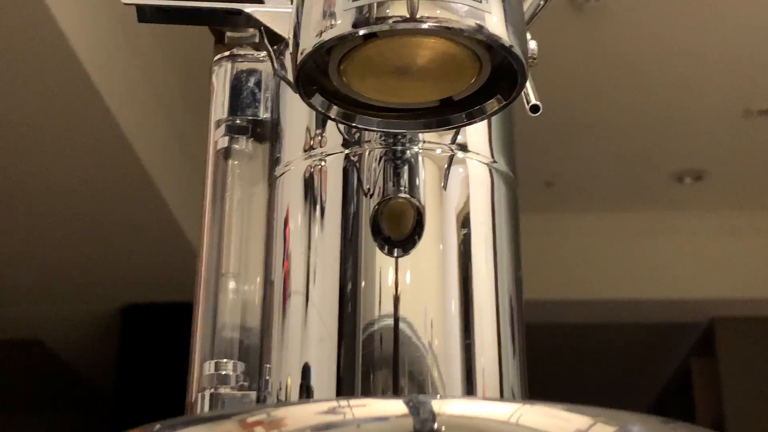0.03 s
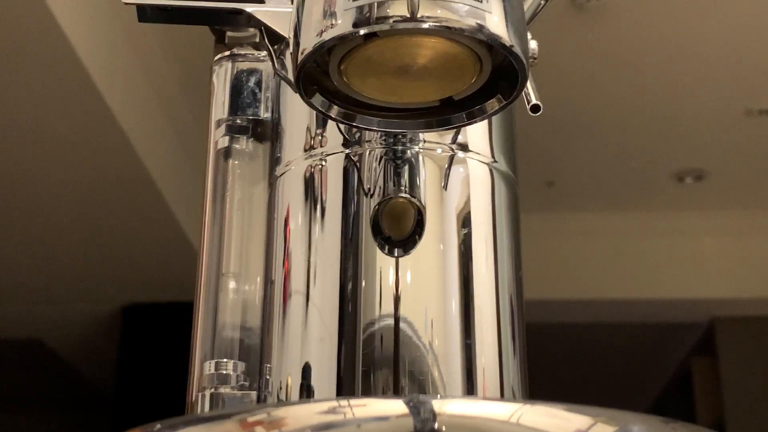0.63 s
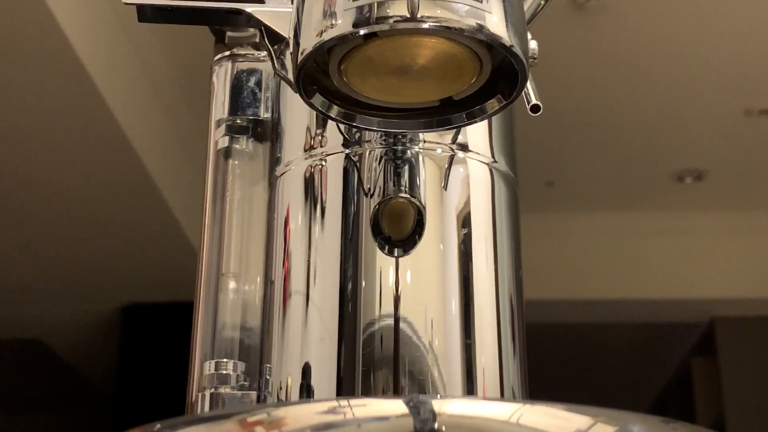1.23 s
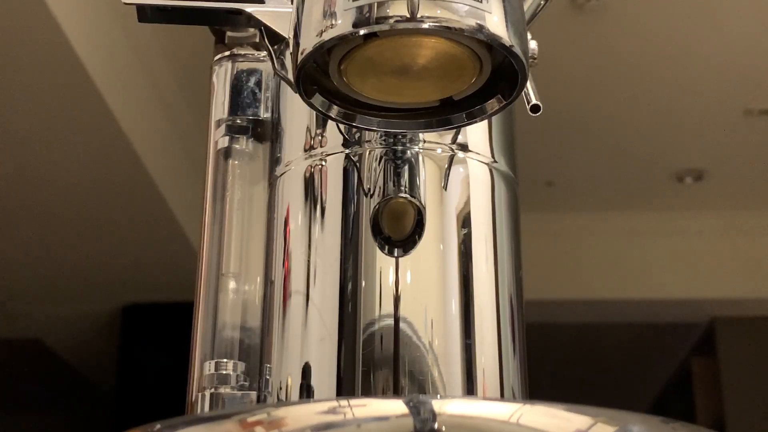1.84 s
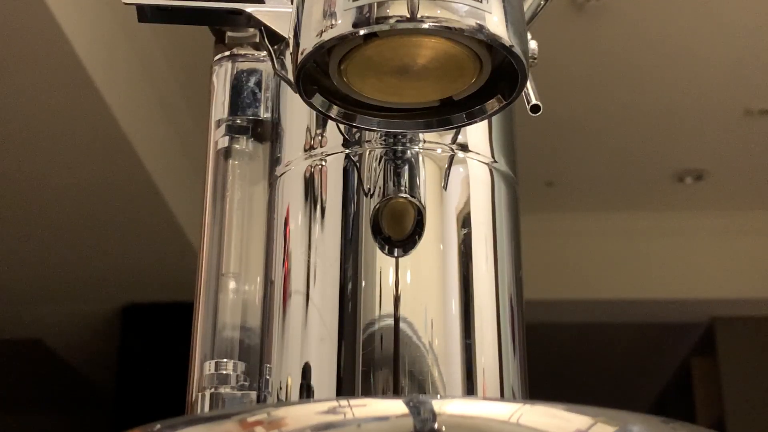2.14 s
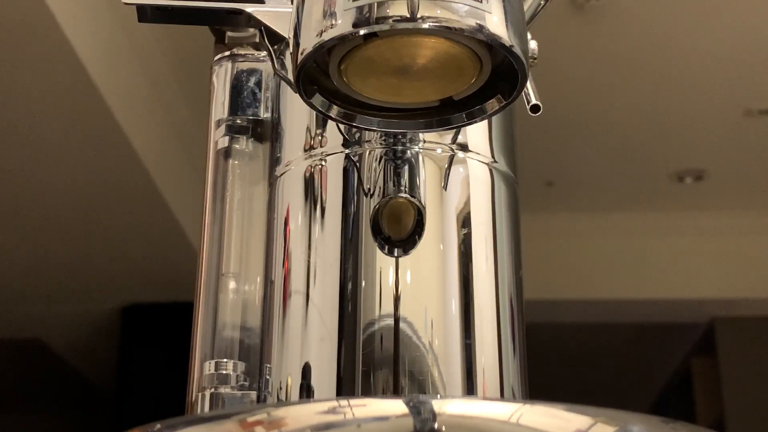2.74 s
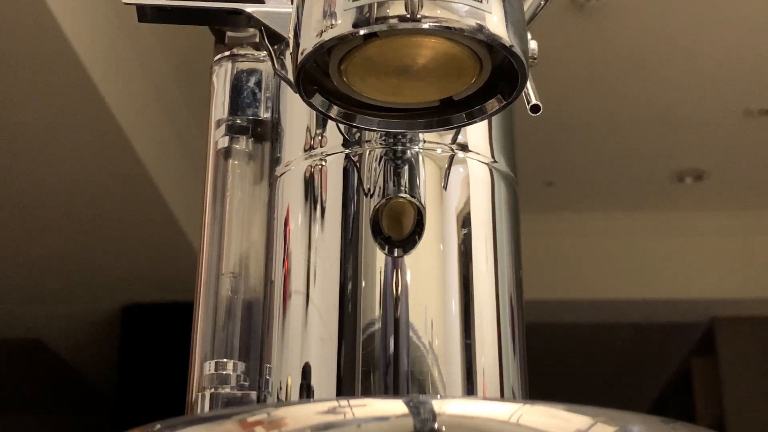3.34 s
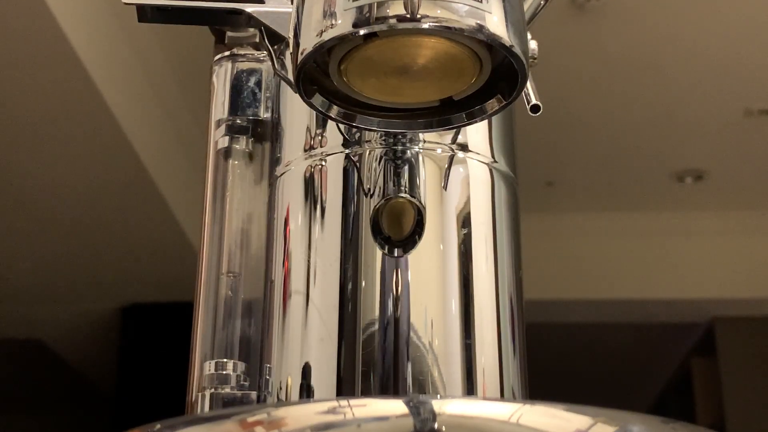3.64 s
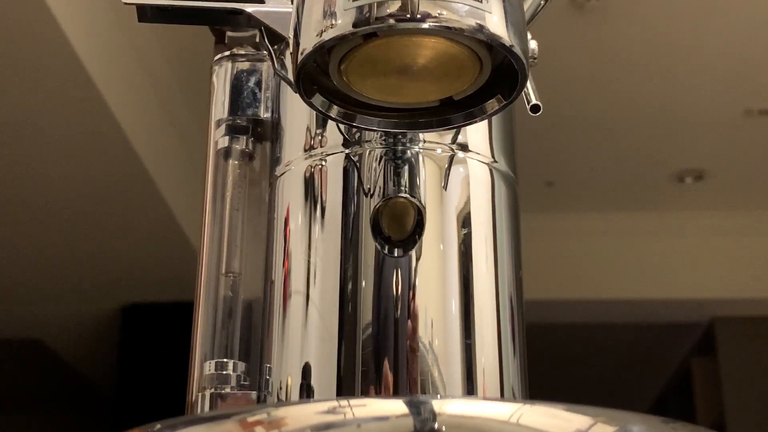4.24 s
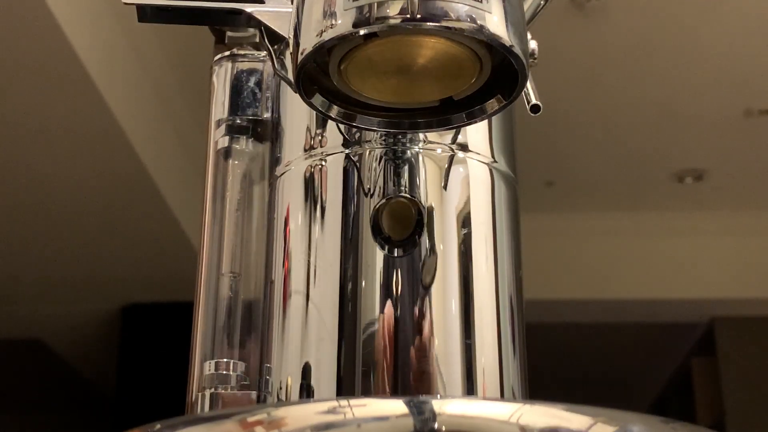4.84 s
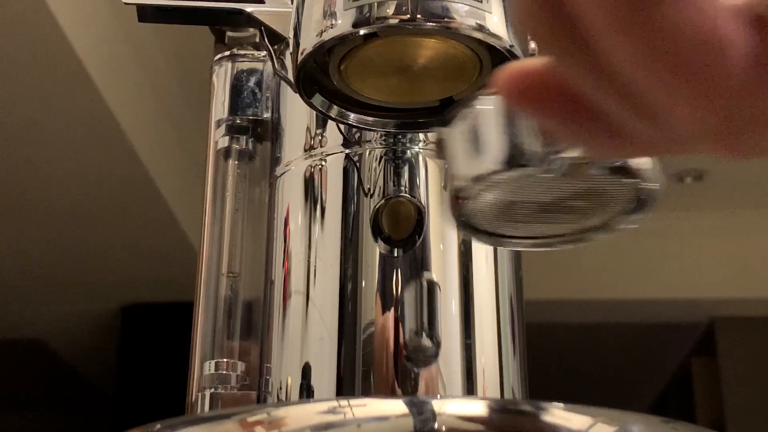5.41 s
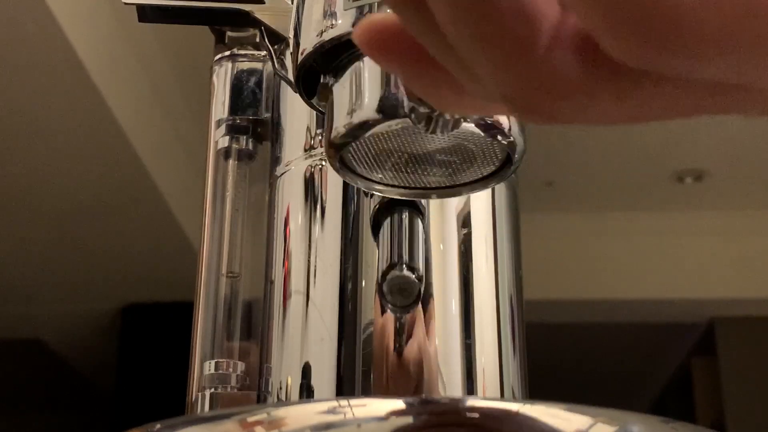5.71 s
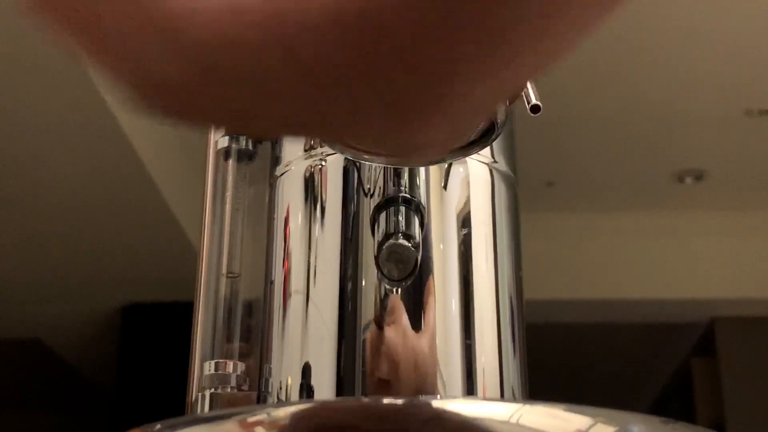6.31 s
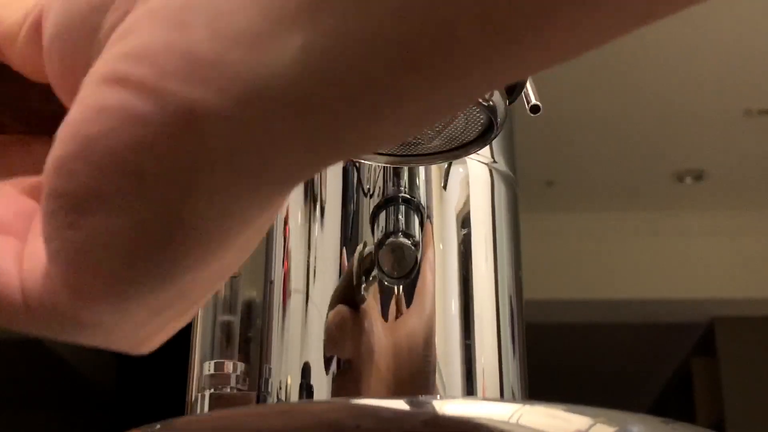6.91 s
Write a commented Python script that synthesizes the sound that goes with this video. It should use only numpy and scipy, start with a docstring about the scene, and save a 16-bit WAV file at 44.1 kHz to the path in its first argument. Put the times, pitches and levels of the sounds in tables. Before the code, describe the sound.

Close up in stereo, a metal portafilter is locked into an espresso machine in a quiet kitchen. At first there is only low room hum, a passing drone, faint rubbing and a far-off knock. Near the end comes one sharp steel clack, then a quick ringing rattle with low thumps as the machine rocks. A fine hiss of metal on rubber and small ticks follow as it tightens.

```python
"""A quiet kitchen hums; a low drone passes, then comes soft rubbing with faint squeaks and far-off knocks.
Close to the stereo microphones a steel portafilter clacks against the group head of a lever espresso
machine. Its lugs rattle into their slots, each contact ringing the steel, and the machine rocks and
shudders on the counter. It is turned tight with a fine hiss of rim on rubber and a few last ticks."""
import sys
import numpy as np
from scipy import signal
from scipy.fft import rfft, irfft, next_fast_len
from scipy.io import wavfile

SR = 44100
rng = np.random.default_rng(int(sys.argv[2]) if len(sys.argv) > 2 else 0)


def transcribe(u):
    """Save the signal u as a 16-bit wav file named by the first command-line argument.

    u: samples, shape (n,) or (channels, n), limited to [-1, 1]; the rate is SR.
    q: integer samples, one column per channel.
    """
    v = np.clip(np.atleast_2d(u).T, -1, 1)
    q = np.round(v * 32767).astype(np.int16)
    wavfile.write(sys.argv[1], SR, q)


N = 311346
TIME = np.arange(N) / SR
SEATED_DETUNE = .025  # the lugs' changing grip shifts each upper steel mode by up to this share

# dull bumps of the machine and counter: t/s, level/dB, f/Hz
MACHINE_BUMPS = [(0.108, -41.5, 278), (5.642, -35, 228), (5.644, -32.5, 107), (5.662, -38, 240),
                 (5.668, -32.5, 90), (5.727, -40, 72), (5.813, -32, 243), (5.815, -38, 100),
                 (5.848, -35.5, 220), (5.8831, -26, 101.5), (5.887, -34.5, 164), (5.913, -35, 242),
                 (5.937, -23, 87), (5.938, -37, 239), (5.969, -32, 65.5), (6.113, -40, 155),
                 (6.219, -36, 85.6)]
# how alike the two microphones hear the room and the frame: f/Hz, likeness
ROOM_LIKENESS = [(60, 0.95), (130, 0.94), (290, 0.8), (640, 0.089), (1410, 0.19), (3100, -0.1),
                 (6820, 0.13), (15000, -0.7)]


def portafilter(crack_db, level_db):
    """Steel on steel, close up: the free clack, the rattle of the lugs and the last ticks."""
    # One contact a row; the harder the gasket is pressed, the shorter the ring:
    # t/s, clack/dB, hollow/dB, bowl ring/dB, sparkle/dB (these three relative to the clack),
    # knock/Hz, bowl/Hz, ping/Hz, ping/dB, share of the free ring time
    contacts = [(1.407, -68.5, -8, 1, -10, 900, 1310, 3980, 11, 0.63),
                (5.6298, -28, -14.5, -6.5, 1.5, 624, 1377, 3070, -14, 0.75),
                (5.6398, -47, -4, -14, 4, 650, 1360, 2080, -2, 0.51),
                (5.6553, -47.5, -0.5, -14, -7, 660, 1368, 2080, -4, .45),
                (5.803, -58, 6, -8, -8, 710, 1430, 2700, -2, 0.45),
                (5.8084, -49, -3.5, -9, -2.5, 1050, 1460, 3180, -2, 0.48),
                (5.8156, -56, -5, 4, -13, 845, 1390, 2690, 2, 0.9),
                (5.8209, -51.5, -12, -9, -9, 960, 1290, 4050, 7, 0.49),
                (5.830, -52, 5, 10, -19, 1020, 1310, 2640, -1, 1),
                (5.841, -41, -5, -2, -6.5, 856, 1140, 3120, -10, 0.26),
                (5.8485, -56.5, 8.5, -3, -16, 700, 1190, 2900, 0, 0.57),
                (5.875, -50.5, 3, 6, -8, 1190, 1380, 2680, 8, 0.89),
                (5.8798, -54, -12, -8, 5, 900, 1370, 4100, -2, 0.39),
                (5.911, -47, -4, -5, -8.5, 700, 1410, 2745, 7, 0.23),
                (5.930, -54.5, 10, 3, -13, 797, 1400, 1880, 1, 0.91),
                (5.9519, -50, 1, -17, -8.5, 1050, 1410, 4130, 3, .6),
                (6.115, -51.5, 0, -.5, -7, 1100, 1320, 2690, 6, 0.92),
                (6.1367, -56.5, -2, 2.5, -19, 850, 1130, 2420, 4, 0.5),
                (6.17, -49, 1, -2, -19, 1000, 1180, 3590, 4.5, 0.59),
                (6.2063, -64, 1, 0, -18, 900, 1200, 3650, 6, .4),
                (6.255, -67, 4, -5, -17, 900, 1200, 2700, 11, .4),
                (6.285, -65.5, 6.5, 4, -9, 968, 1155, 2480, 6, .97),
                (6.6975, -57.5, -4.5, -8, -22, 850, 1280, 2770, 8, 0.69),
                (6.862, -52, -16, -5, -14, 950, 1237, 3540, 17, 0.52)]
    seated_s = 5.75
    out = np.zeros((2, N))
    for s, clack_db, hollow_db, ring_db, sparkle_db, *tuning in contacts:
        register_db = level_db + clack_db + np.array([hollow_db, ring_db, 0, sparkle_db])
        detune = SEATED_DETUNE * (s > seated_s)
        add(out, s, strike(register_db, *tuning, crack_db, detune))
    return out


def strike(register_db, knock_hz, bowl_hz, ping_hz, ping_db, ring_share, crack_db, detune):
    """One contact: steel modes over a short crack; where it lands tunes the knock, bowl and ping."""
    # modes of portafilter and group head: f/Hz, level/dB, t60/s, lead at the left microphone/rad
    steel_modes = [(640, -15.5, .05, 3.3), (850, -16.5, .04, 2.5), (975, -13, .05, 1.5),
                   (1080, -11, 0.044, 2), (2030, 5, .015, 2.5), (2680, -15.5, .07, 5),
                   (2874, -1, 0.023, 3.9), (3110, -1, .023, 1.5), (3340, -12.5, 0.061, 2.5),
                   (3860, 8, .011, 3.8), (4430, 4.5, 0.01, 3.5), (4430, -19, .21, -2),
                   (4580, -16, .018, -1.5), (5092, -4, .014, 3.5), (5240, -30, .15, 3),
                   (5600, -12.5, 0.01, -2.3), (5970, 3, .013, 4.5), (6000, -22.5, 0.19, -1),
                   (6840, 0.5, 0.0133, 4.2), (7900, 5.5, 0.007, -1), (8250, -4, 0.012, 5),
                   (8600, -7, .016, -0.5), (8990, -1.5, .015, 4.5), (9743, -1.5, 0.012, -0.1),
                   (10370, 1.5, .014, 0.5), (10520, -2.5, 0.014, 1), (12661, -4.5, .016, 4.5),
                   (12960, -8, .016, 1.1), (13800, -8, .012, 2), (14104, -7, .015, 0)]
    # steel crack, with a notch filtered out near 12 kHz: f/Hz, density/dB
    crack_spectrum = [(300, 5.5), (650, -3.5), (1000, 0), (1600, 1.5), (2000, 7), (2500, 4), (3000, 7.5),
                      (3700, 4), (4400, 5), (5400, 0.5), (6500, 5), (8100, 4.5), (10300, 0), (11800, -13.5),
                      (13500, -3.5), (15000, -24), (16500, -34.5)]
    # how alike the two microphones hear the metal: f/Hz, likeness
    steel_likeness = [(400, 0.74), (1400, 1), (2400, -0.58), (4500, -0.24), (8000, -0.69), (14000, 0.64)]
    # edges of the low, clack and sparkle registers: f/Hz
    register_hz = [420, 1650, 5500, 17000]
    crack_t60, rise_s = .018, .00046
    t = np.arange(8192) / SR
    ping = [(ping_hz * ratio, ping_db - 4, .03, 1.8) for ratio in (.98, 1.03)]  # columns as steel_modes
    body = [(knock_hz, -8, .04, .4), (bowl_hz, -1, .052, .4)]
    hz, db, t60, lead = np.transpose(steel_modes + ping + body)[:, :, None]
    shift = detune * rng.uniform(-.89, 1, hz.shape) * (hz > register_hz[1])
    shift[len(steel_modes):] = 0  # ping and body keep their pitch
    angle = 2 * np.pi * hz * (1 + shift) * t  # one blow starts all modes together
    decay = amp(db - 60 * t / (t60 * ring_share))
    ring = np.array([(decay * np.sin(angle + side * lead)).sum(0) for side in (.5, -.5)])
    crack = amp(crack_db - 60 * t / crack_t60) * noise(crack_spectrum, len(t), steel_likeness)
    blow = (ring + crack) * (1 - np.exp(-(t / rise_s) ** 2))
    edges = sorted(register_hz + [.88 * bowl_hz])  # splits the low register into hollow and bowl ring
    out = np.zeros_like(blow)
    for lo, hi, level_db in zip(edges, edges[1:], register_db):
        bandpass = signal.butter(3, [lo, hi], "band", fs=SR, output="sos")
        band = signal.sosfiltfilt(bandpass, blow, padtype=None)
        attack_rms = np.sqrt(np.mean(band[:, :SR // 50] ** 2))
        out += amp(level_db) * band / attack_rms
    return out


def lugs(level_db=-76, start_s=5.803, end_s=5.94):
    """The lugs scrape in their slots: tiny slips that ring the same steel."""
    train = slips(N, per_s=110, spread_db=3) * (TIME > start_s) * (TIME < end_s)
    ring = strike(level_db + np.array([9, -3, 15, -5]), knock_hz=840, bowl_hz=1350, ping_hz=2700,
                  ping_db=29.5, ring_share=.29, crack_db=5, detune=SEATED_DETUNE)
    return signal.oaconvolve(train[None], ring, axes=1)[:, :N]


def bumps(level_db=-2):
    """The heavy machine rocks on the counter: low swings that build and die."""
    out, t = np.zeros((2, N)), np.arange(SR // 2) / SR
    for s, db, hz in MACHINE_BUMPS:
        swell_s = .0084 * (100 / hz) ** .4  # lower bumps swell more slowly
        envelope = t / swell_s * np.exp(1 - t / swell_s)
        add(out, s, amp(db + level_db) * envelope * np.sin(2 * np.pi * hz * t))
    return out


def shudder(touch_s=5.6, rise_s=.017, decay_s=.047):
    """Once steel touches the head, the frame shudders after each bump and while the hand leans on it."""
    # the hand's pushes as it tightens: t/s, level/dB, swell/s, ease/s
    pushes = [(6.27, -50.5, 0.14, 0.69), (6.83, -47.5, 0.081, 0.12)]
    # rumble of the frame: f/Hz, density/dB
    frame_spectrum = [(20, -16.5), (40, -1), (75, 6.5), (140, -4), (200, -3), (270, -13.5), (340, -2.5),
                      (450, -32.5), (650, -29), (1200, -37.5), (3000, -72)]
    power = strokes(pushes) ** 2
    for s, db, _ in MACHINE_BUMPS:
        if s > touch_s:
            t = np.maximum(TIME - s, 0)
            envelope = (1 - np.exp(-t / rise_s)) * np.exp(-t / decay_s)
            power += (amp(-25 + .47 * db) * envelope) ** 2  # harder bumps shake it more
    return np.sqrt(power) * noise(frame_spectrum, next_fast_len(N), ROOM_LIKENESS)[:, :N]


def rim_slide(level_db=-1):
    """A grainy hiss as the rim slides into the slots and round under the gasket."""
    # turns of the handle: t/s, level/dB, swell/s, ease/s
    turns = [(5.8, -58.5, 0.047, 0.069), (6.21, -66, 0.016, .1), (6.33, -64, 0.04, 0.18),
             (6.47, -66.5, 0.24, 0.19), (6.82, -75, 0.045, 0.26)]
    # rim hiss, with a notch filtered out near 12 kHz: f/Hz, density/dB
    slide_spectrum = [(600, -3), (1300, 2), (2000, -2), (2800, 8.5), (3700, 3), (4700, 7), (5600, 0.5),
                      (7600, 7.5), (8600, 0), (10300, 4), (12000, -14.5), (13700, -9), (15000, -31)]
    # steel resonances it excites: f/Hz, width/Hz, lift/dB
    resonances = [(2680, 200, 7), (3700, 200, 5), (4650, 220, 6)]
    hiss = scrape(slide_spectrum, slips_per_s=2500, spread_db=3, peaks=resonances)
    return amp(level_db) * strokes(turns) * hiss * flutter(depth_db=1.3, grain_s=.008)


def gasket(level_db=-1):
    """Rubber sizzles under the rim as the handle is turned tight."""
    # how hard the gasket drags, in three surges: t/s, level/dB
    effort = [(6.25, -88), (6.275, -72), (6.315, -67), (6.345, -70), (6.39, -72), (6.45, -65), (6.5, -64),
              (6.56, -70), (6.61, -62), (6.66, -72.5), (6.72, -91)]
    # gasket sizzle, with a notch filtered out near 12 kHz: f/Hz, density/dB
    drag_spectrum = [(7000, -24), (8800, -8), (9800, -2), (10800, -1), (11500, -2), (12100, -7),
                     (12800, -2.5), (14200, -2.5), (14800, -28)]
    # steel resonances it excites: f/Hz, width/Hz, lift/dB
    resonances = [(9900, 290, 4.6), (10560, 110, 7)]
    sizzle = scrape(drag_spectrum, slips_per_s=5000, spread_db=2.7, peaks=resonances)
    return amp(level_db) * swell(effort) * sizzle * flutter(depth_db=.8, grain_s=.014)


def rubbing(level_db=2):
    """Soft strokes of friction as the portafilter is readied."""
    # strokes of the hand: t/s, level/dB, swell/s, ease/s
    rubs = [(1.58, -67, .02, 0.075), (1.67, -69.5, 0.059, .07), (2.055, -65.5, 0.1, 0.071),
            (2.51, -69, 0.17, 0.17), (2.6, -65.5, 0.12, 0.15), (2.745, -69.5, 0.031, 0.036),
            (2.95, -72.5, 0.43, 0.27), (3.26, -65, 0.21, 0.056), (3.42, -73, 0.29, 0.52),
            (3.88, -77, 0.27, 0.094), (4.08, -77, 0.048, 0.18), (4.38, -78.5, 0.19, 0.16),
            (4.695, -71.5, 0.072, 0.028), (4.965, -76.5, 0.074, 0.056)]
    # rubbing noise, with a notch filtered out near 12 kHz: f/Hz, density/dB
    rub_spectrum = [(500, -3), (1400, 3.5), (2600, -0.5), (4000, -1), (6500, -3.5), (10000, -5.5),
                    (12000, -23), (13500, -10), (15000, -58)]
    rub = scrape(rub_spectrum, slips_per_s=5000, spread_db=2.5)
    return amp(level_db) * strokes(rubs) * rub * flutter(depth_db=1.3, grain_s=.011)


def friction_bands():
    """Brief bands of friction noise: faint squeaks, a rasp and a high hiss."""
    # one band a row: t/s, level/dB, f/Hz, width/Hz, half length/s
    bands = [(1.888, -71.5, 2370, 700, 0.08), (2.55, -64.5, 3640, 1900, 0.073),
             (4.1, -73, 12500, 2400, 0.053), (5.38, -80, 4830, 500, 0.044), (6.288, -59, 10300, 900, 0.021)]
    out, size = np.zeros((2, N)), next_fast_len(N)
    hz = np.fft.rfftfreq(size, 1 / SR)
    for s, db, centre_hz, width_hz, half_s in bands:
        white = rfft(rng.standard_normal((2, size)))
        band = irfft(white * resonance(hz, centre_hz, width_hz), size)[:, :N]
        out += amp(db) * unit(band) * np.exp(-((TIME - s) / half_s) ** 2)
    return out * flutter(depth_db=-1, grain_s=.0054)


def distant_knocks(tick_db=3, tick_t60=.014, reverb_db=-2, rise_s=.0025, ring_s=.034, tail_s=.06):
    """Knocks further off in the room: each a short sharp tick, then its own reverberation."""
    # faint knocks: t/s, level/dB
    knocks = [(3.4537, -51.5), (4.596, -70.5)]
    # colours of the tick and of its reverberation: f/Hz, density/dB
    tick_spectrum = [(500, -9), (1800, -10), (3300, 13), (5200, -5), (6300, -2), (7500, -24), (15000, -40)]
    reverb_spectrum = [(300, 15), (900, 11), (1700, 10), (2600, 5), (3700, 3), (5000, -3), (7000, -7),
                       (10000, -39), (15000, -42)]
    resonances = [(2320, 250, 7.1), (3730, 230, 4.6), (4340, 160, 1.8)]  # f/Hz, width/Hz, lift/dB
    out, t = np.zeros((2, N)), np.arange(16384) / SR
    bloom = (np.exp(-t / ring_s) + amp(-6) * np.exp(-t / tail_s)) * (1 - np.exp(-t / rise_s))
    for s, db in knocks:
        tick = amp(-60 * t / tick_t60) * noise(tick_spectrum, len(t), likeness=[(1000, .6), (8000, .6)])
        reverb = bloom * noise(reverb_spectrum, len(t), peaks=resonances)
        add(out, s, amp(db + tick_db) * tick + amp(db + reverb_db) * reverb)
    return out


def kitchen(sound, near_db=-9, near_t60=.11, far_db=-14, build_s=.008):
    """Back at the microphones: single echoes, quick scatter off machine and counter, the room's tail."""
    # reflections from counter and walls: delay/s, level/dB
    echoes = [(.0094, -25), (0.0055, -15), (0.017, -24), (0.033, -51)]
    # decay of the kitchen: f/Hz, t60/s
    decay_times = [(200, 0.43), (1000, 0.59), (3000, 0.43), (4500, 0.42), (7000, 0.34), (14000, 0.29)]
    size = SR // 2
    t = np.arange(size) / SR
    hz, frame_s, white = signal.stft(rng.standard_normal((2, size)), SR, nperseg=256)
    decay = amp(-60 * frame_s / read(decay_times, hz)[:, None])
    far = signal.istft(white * decay, SR, nperseg=256)[1][:, :size]
    # nearby surfaces reach both microphones alike at long wavelengths
    scatter = noise([(500, 1), (1400, -4.5), (4000, -2), (14000, -8)], size,
                    likeness=[(1400, .93), (3000, .076)])
    near = scatter * amp(-60 * t / near_t60)
    onset = 1 - np.exp(-(t / build_s) ** 2)
    response = (amp(near_db) * unit(near * onset) + amp(far_db) * unit(far * onset)) / np.sqrt(size)
    for delay_s, db in echoes:
        arrivals = round(delay_s * SR) + rng.integers(0, 6, 2)  # one for each microphone
        response[[0, 1], arrivals] += amp(db)
    return signal.fftconvolve(sound, response, axes=1)[:, :N]


def room_tone(air_db=-51.5, waver_rad=.64, waver_s=.15):
    """Rumbling air, an appliance's wavering hum and a passing low drone, a touch louder on the right."""
    # steady air of the room: f/Hz, density/dB
    air_spectrum = [(20, -27), (34, -17), (52, -11), (76, -4.5), (110, -5.5), (190, -11.5), (320, -12.5),
                    (555, -20.5), (800, -24.5), (1100, -25), (1900, -36.5), (4000, -49), (8500, -53.5),
                    (13500, -49), (15200, -80)]
    # its broad resonances: f/Hz, width/Hz, lift/dB
    resonances = [(79.4, 76, 3.5), (169.3, 41, 6.5), (649, 19, 5.5), (1076, 270, 4.5)]
    # tones of the appliance: f/Hz, level/dB
    hum_tones = [(85.9, -59.5), (235.5, -67.5), (334.6, -68.5), (443, -73), (472, -74.5), (554.6, -74.5)]
    # the drone swells and sinks: t/s, level/dB, f/Hz
    drone_path = [(.55, -72, 74.6), (.66, -51.5, 74.5), (.9, -48.5, 69.1), (1.02, -52, 69.4),
                  (1.2, -67, 67.3)]
    air = amp(air_db) * noise(air_spectrum, next_fast_len(N), ROOM_LIKENESS, resonances)[:, :N]
    hum = np.zeros(N)
    for hz, db in hum_tones:
        walk = np.cumsum(rng.standard_normal(1024))
        drift = np.interp(TIME / waver_s, np.arange(1024), walk)
        hum += amp(db) * np.sin(2 * np.pi * hz * TIME + waver_rad * drift)
    s, _, drone_hz = np.transpose(drone_path)
    drone_phase = 2 * np.pi * np.cumsum(np.interp(TIME, s, drone_hz)) / SR
    drone = swell(drone_path) * np.sin(drone_phase)
    return (air + np.sqrt(2) * (hum + drone)) * amp([[-.5], [.5]])


def slips(size, per_s, spread_db):
    """Surfaces catch and let go: randomly timed impulses of uneven size."""
    slipping = rng.random(size) < per_s / SR
    return slipping * amp(spread_db * np.clip(rng.standard_normal(size), -2, 2))


def scrape(spectrum, slips_per_s, spread_db, peaks=()):
    """Friction as a dense run of tiny slips ringing the given resonances."""
    size = next_fast_len(N)
    return noise(spectrum, size, peaks=peaks, grains=slips(size, slips_per_s, spread_db))[:, :N]


def flutter(depth_db, grain_s):
    """Random flutter in the gain of a friction sound as the surfaces catch and let go."""
    knots = np.arange(0, 8, grain_s)
    return amp(depth_db * np.interp(TIME, knots, rng.standard_normal(4001)[:len(knots)]))


def strokes(rows, roundness=1.02):
    """Gain of hand strokes that each swell to a peak at their time and ease off; overlaps add in power."""
    power = np.zeros(N)
    for s, db, swell_s, ease_s in rows:
        away = np.maximum((s - TIME) / swell_s, (TIME - s) / ease_s)
        power += (amp(db) * np.exp(-np.minimum(away, 10) ** roundness)) ** 2
    return np.sqrt(power)


def swell(rows):
    """Gain over time from rows of t/s, level/dB; silent outside them."""
    s, db = np.transpose(rows)[:2]
    return amp(np.interp(TIME, s, db, left=-200, right=-200))


def noise(spectrum, size, likeness=((1, 0), (2, 0)), peaks=(), grains=1):
    """Stereo noise of rms 1 with a colour, left-right likeness and resonances; grains break it up."""
    hz = np.fft.rfftfreq(size, 1 / SR)
    left, other = rfft(rng.standard_normal((2, size)) * grains)
    alike = np.clip(read(likeness, hz), -1, 1)
    right = alike * left + np.sqrt(1 - alike ** 2) * other
    db = read(spectrum, hz) + sum(lift * resonance(hz, f, width) for f, width, lift in peaks)
    return unit(irfft(np.array([left, right]) * amp(db), size))


def resonance(hz, centre_hz, width_hz):
    """A bell-shaped peak of height 1."""
    return 1 / (1 + (2 * (hz - centre_hz) / width_hz) ** 2)


def read(points, hz):
    """Reads a table on a log-frequency axis."""
    f, value = np.transpose(points)
    return np.interp(np.log(hz + 1), np.log(f + 1), value)


def add(mix, s, sound):
    """Mixes a sound in at time s."""
    part = mix[:, max(round(s * SR), 0):][:, :sound.shape[-1]]
    part += sound[..., :part.shape[1]]


def amp(db):
    """Decibels to gain."""
    return 10 ** (np.asarray(db) / 20)


def unit(x):
    """Scales to rms 1."""
    return x / np.sqrt(np.mean(x ** 2) + 1e-20)


def scene():
    """The machine close to the microphones, the kitchen around it."""
    friction = lugs() + rubbing() + rim_slide() + gasket()
    direct = portafilter(level_db=-1.5, crack_db=1)
    # the room gathers the steel's sound from all directions, which evens out its modes: more crack
    all_round = portafilter(level_db=-2.5, crack_db=17)
    machine = direct + friction + kitchen(all_round + friction) + bumps() + shudder()
    return machine + distant_knocks() + friction_bands() + room_tone()


def record(dry):
    """The microphones open just after the start; a steep low-pass takes off the highest treble."""
    open_s, fade_s, edge_hz = .035, .004, 16300
    opened = dry * np.clip((TIME - open_s) / fade_s, 0, 1)
    lowpass = signal.firwin(255, edge_hz, window=("kaiser", 9), fs=SR)
    return signal.oaconvolve(opened, lowpass[None], "same")


dry = scene()
out = record(dry)
transcribe(out)
```